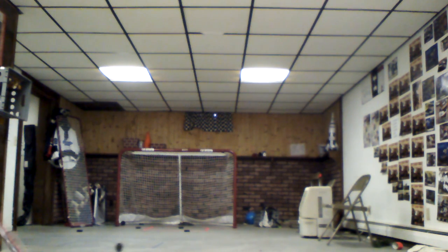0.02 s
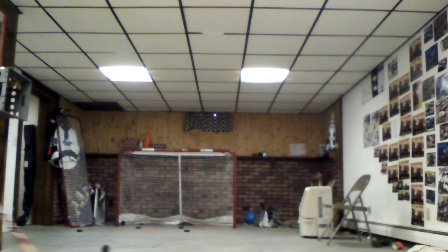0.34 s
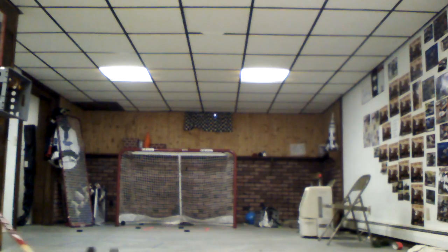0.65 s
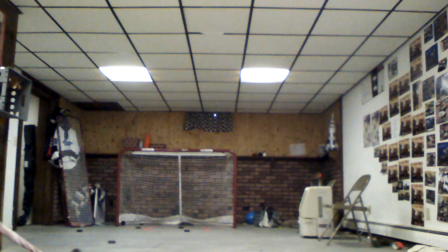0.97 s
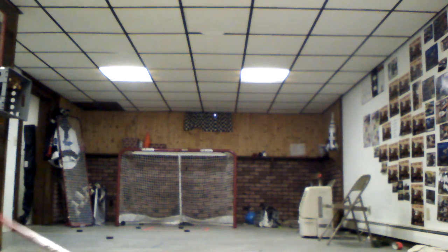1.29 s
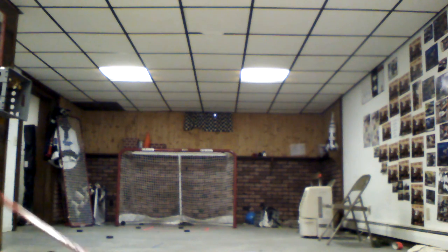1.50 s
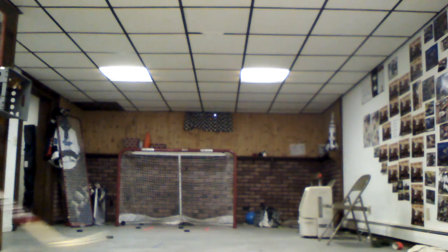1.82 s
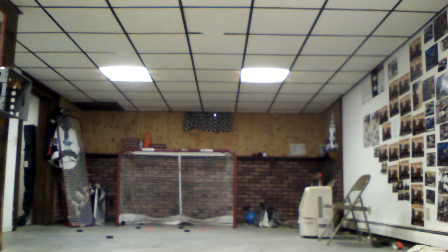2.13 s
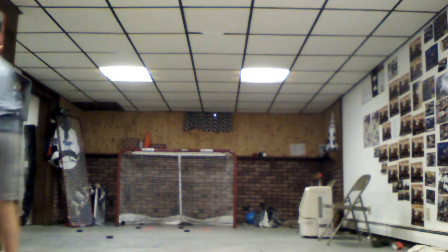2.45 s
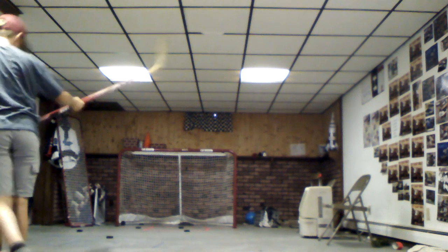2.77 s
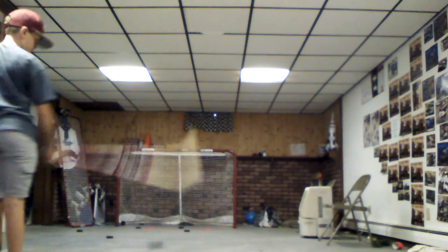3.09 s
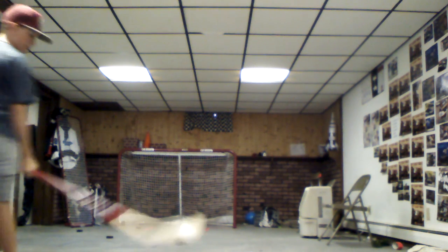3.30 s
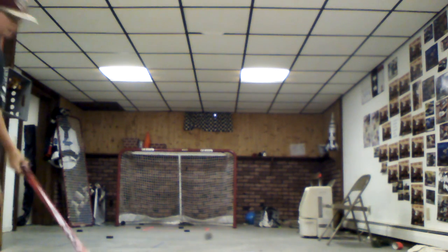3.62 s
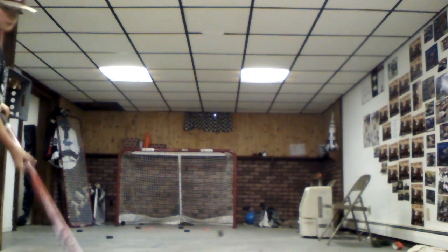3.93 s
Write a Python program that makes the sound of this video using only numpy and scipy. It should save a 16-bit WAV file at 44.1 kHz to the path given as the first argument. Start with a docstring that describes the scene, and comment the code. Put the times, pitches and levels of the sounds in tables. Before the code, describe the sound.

Hockey pucks scrape loudly over a hard floor with a few bumps, and one wobbles to rest. A stick slaps the floor, then cracks a slap shot, heard from a distance in a low basement room.

```python
"""Hockey practice in a low basement room, on a small microphone far enough off to hear mostly walls.
First a loud, gritty scrape, probably pucks swept over the hard floor, dies away among bumps. Around
one second in, a puck wobbles to rest on its rim, leaving mains hum, a low rush and hiss. At 2.3 s the
stick blade slaps the floor; the player steps up, clothes brush on the swing, and at 3.8 s a slap shot
cracks."""
import sys
import numpy as np
from scipy import signal
from scipy.fft import rfft, irfft
from scipy.io import wavfile

SR = 44100
rng = np.random.default_rng(int(sys.argv[2]) if len(sys.argv) > 2 else 0)


def to_wav(sig):
    """Store sig (one row per channel, or 1-D mono) as 16-bit WAV at the path in sys.argv[1].

    Samples outside -1..1 are clipped; the rate is SR.
    """
    pcm = np.clip(np.atleast_2d(sig), -1, 1) * 32767
    pcm = np.round(pcm).astype(np.int16)
    wavfile.write(sys.argv[1], SR, pcm.T)  # frames by channels


N = 176400

# force of the scrape (time [s], level [dB])
SCRAPE_LEVEL = [(0, -8.5), (.12, -10.5), (.36, -11.5), (.46, -12), (.54, -16), (.62, -17), (.72, -19),
                (.8, -29), (.86, -53), (.95, -50)]
# floor and pucks under the scrape (frequency [Hz], relative level [dB])
SCRAPE_BODY = [(60, -45), (200, -30), (450, -17.5), (800, -13), (1150, -6.5), (1550, 1), (2100, -0.5),
               (2800, -4), (4000, -10), (6000, -19.5), (9500, -28.5), (15500, -45.5)]
# broad rasp, sinking as the pucks slow (time [s], pitch [Hz], level [dB])
RASP = [(0, 1981, -22), (.28, 2200, -17.5), (.4, 1844, -16), (0.511, 1812, -12), (0.619, 1750, -19.5),
        (.75, 1650, -28), (.85, 1579, -69)]
# fine hiss of rubber sliding on grit (time [s], level [dB])
SLIDE_LEVEL = [(0, -22), (.2, -23.5), (.45, -28), (.72, -37), (.82, -48.5), (.92, -46), (1.07, -50.5),
               (1.14, -62), (1.24, -68), (1.31, -79.5), (1.38, -92)]
# colour of that hiss (frequency [Hz], relative level [dB])
SLIDE_BODY = [(200, -8.5), (1500, 6), (2600, -1.5), (3250, 6.5), (4200, -3), (5500, -6.5), (7500, 3),
              (10000, -7.5), (15500, -15.5)]
# pucks bumping the blade and one another (time [s], thud level [dB], clack level [dB])
BUMPS = [(.0, -40, -30), (.035, -47, -26), (.172, -36, -33.5), (.24, -47, -39.5), (0.476, -39, -37.5),
         (.745, -35.5, -34), (.78, -53, -24.5), (0.841, -43.5, -37.5), (0.952, -45, -68), (1.126, -62, -51)]
# thud of the floor (frequency [Hz], relative level [dB])
THUD_BODY = [(40, -32), (75, -26), (105, 1.5), (160, -5), (235, 6), (330, -4.5), (700, -24.5), (2000, -56),
             (15500, -86)]
# clack of a puck (frequency [Hz], relative level [dB])
CLACK_BODY = [(100, -31.5), (350, -8), (520, -7.5), (640, 7), (1100, 0), (1600, 1.5), (2300, -15.5),
              (5000, -20.5), (15500, -43)]
# rings of the wobbling puck (pitch [Hz], width [Hz], start [s], length [s], level [dB])
WOBBLE_RINGS = [(153, 54, .83, 0.24, -44.5), (280, 80, 1.12, 0.13, -53), (454, 32, 1.0, 0.194, -49),
                (665, 29, 0.938, 0.212, -36), (918, 59, 1.147, 0.087, -43.5),
                (1622, 90, 1.17, 0.059, -47.5), (1470, 590, .9, 0.33, -49)]
# rumble of the rolling rim (time [s], level [dB])
ROLL_LEVEL = [(.84, -58), (.93, -40.5), (1.18, -53), (1.29, -65), (1.35, -74), (1.39, -93.5)]
# colour of that rumble (frequency [Hz], relative level [dB])
ROLL_BODY = [(50, -18), (130, 0), (400, -5), (900, -7), (1700, -14.5), (2500, -27), (5000, -34),
             (15500, -54)]
# hum of mains and lights (frequency [Hz], level [dB])
HUM_TONES = [(70, -89), (119.5, -80), (240, -92)]
# the hum swells and sinks (time [s], gain [dB])
HUM_SWELL = [(1.5, 0), (2.08, -1.5), (2.14, -5.5), (2.35, -4.5), (2.9, -3), (3.35, -6.5), (3.5, -7)]
# low rush of the room (frequency [Hz], relative level [dB])
AIR_COLOUR = [(20, -6), (50, -9), (100, -8), (220, -1.5), (320, -9.5), (700, -12), (2000, -20.5),
              (15500, -39.5)]
# background hiss (frequency [Hz], relative level [dB])
HISS_COLOUR = [(100, 3.5), (2000, 0), (5500, -5), (7500, 1), (10000, -2.5), (15500, -1)]
# the hiss swells and sinks (time [s], gain [dB])
HISS_SWELL = [(1.4, -4.5), (1.7, -0.5), (2.08, -3.5), (2.12, 1), (3.1, -1.5), (3.5, 0.5)]
# the blade landing, then lying flat (time [s], level [dB], hardness [0 floor slap to 1 shot])
BLOWS = [(2.32, -21.5, 0.12), (2.333, -23.5, 0), (2.353, -20.5, 0.026), (3.833, -22.5, 0.89),
         (3.843, -24.5, 0.92), (3.868, -22.5, 0.97), (3.908, -26.5, 0.83), (3.943, -45, 1)]
# colour of a blow (frequency [Hz], floor slap level [dB], shot level [dB])
BLOW_BODY = [(40, -49, -41.5), (116.2, -21.5, -20.5), (178.8, -24.5, -18), (228.4, -20, -1.5),
             (278, -19.5, -25), (444, -11, -11.5), (637, 0.5, -1.5), (850, -5, -3.5), (1079, -0.5, -2.5),
             (1220, -6.5, 2), (1503, -7.5, -6), (1750, -14, -2), (1900, -14.5, -13.5), (2400, -15, -0.5),
             (2750, -23.5, -6.5), (3540, -21, -11), (4750, -19, -28), (6230, -35, -34.5),
             (7470, -31, -29.5), (9210, -37, -31), (15600, -48.5, -51)]
# shoes scuffing the floor (time [s], level [dB])
SCUFF_LEVEL = [(2.5, -92.5), (2.56, -64.5), (2.68, -69.5), (2.77, -76), (2.84, -73), (2.9, -95)]
# colour of the scuffing (frequency [Hz], relative level [dB])
SCUFF_BODY = [(50, 1), (200, 10), (400, -12), (1100, -9), (2000, -19.5), (3300, -24), (15500, -44)]
# footfalls (time [s], level [dB])
STEPS = [(2.579, -65.5), (2.65, -72), (2.71, -72), (2.775, -73), (2.851, -85), (3.13, -82), (3.56, -88)]
# brushing clothes (frequency [Hz], relative level [dB])
CLOTH_BODY = [(200, 0), (600, 4), (1500, -9), (5000, -14), (7500, 4.5), (11000, -5), (15500, -17)]
# reverberation of the basement (frequency [Hz], time to fall 60 dB [s])
ROOM_T60 = [(80, .36), (250, 0.46), (700, .3), (1500, 0.3), (3000, 0.32), (5000, 0.37), (8000, 0.42),
            (11000, .4), (15000, 0.32)]

TIME = np.arange(N) / SR


def amp(db):
    """Decibels to gain."""
    return 10 ** (np.asarray(db) / 20)


def unit_rms(x):
    """Scales to rms 1."""
    return x / np.sqrt(np.mean(x ** 2) + 1e-20)


def at_frequency(points, hz):
    """Reads a table on a log-frequency axis."""
    table_hz, value = np.transpose(points)
    return np.interp(np.log(hz + 1), np.log(table_hz + 1), value)


def fader(points, after_db=-np.inf):
    """Gain at every sample from (time [s], level [dB]); after_db=None holds the last level."""
    return amp(np.interp(TIME, *np.transpose(points), right=after_db))


def add(mix, start_s, sound):
    """Mixes a sound in at a time."""
    part = mix[round(start_s * SR):][:len(sound)]
    part += sound[:len(part)]


def ring(body, size=4096):
    """Minimum-phase impulse response of a body, with energy 1."""
    log_gain = np.log(amp(at_frequency(body, abs(np.fft.fftfreq(size, 1 / SR)))))
    response = np.fft.ifft(np.exp(np.conj(signal.hilbert(log_gain)))).real[:size // 2]
    return response / np.linalg.norm(response)


def coloured(x, body):
    """Passes a steady signal through a body; rms 1."""
    return unit_rms(signal.oaconvolve(x, ring(body))[:N])


def noise(body):
    """Steady noise in the colour of a body; rms 1."""
    return coloured(rng.standard_normal(N), body)


def resonate(x, hz, width_hz):
    """A steep resonance that follows a pitch curve; rms 1."""
    carrier = np.exp(2j * np.pi * np.cumsum(hz) / SR)
    pole = np.exp(-np.pi * width_hz / SR)
    baseband = signal.lfilter([(1 - pole) ** 2], [1, -2 * pole, pole ** 2], x / carrier)
    return unit_rms((carrier * baseband).real)


def drift(rate_hz):
    """Smooth random wander; rms 1."""
    hz = np.fft.rfftfreq(N, 1 / SR)
    return unit_rms(irfft(rfft(rng.standard_normal(N)) * np.exp(-(hz / rate_hz) ** 2), N))


def impacts(per_s, spread_db=3.5):
    """Random tiny impacts of uneven size."""
    size = amp(spread_db * np.minimum(rng.exponential(1, N), 4))
    return size * rng.choice([-1, 1], N) * (rng.random(N) < per_s / SR)


def strike(body, db, contact_s=.004, chatter=.35):
    """One contact with a short chatter rings a body; db is its level over a tenth of a second."""
    t = np.arange(SR // 20) / SR
    force = rng.standard_normal(len(t)) * np.exp(-t / contact_s)
    force *= chatter / np.linalg.norm(force)
    force[0] += 1
    return amp(db) * np.sqrt(SR / 10) * signal.fftconvolve(force, ring(body))


def echoes(direct_db=-23.5, smear_s=.003, gap_s=.003, build_s=.014):
    """From one spot to the microphone: a weak direct sound, then reflections dying band by band."""
    t = np.arange(SR * 3 // 4) / SR
    taps = rng.choice([-1., 1.], len(t)) * (rng.random(len(t)) < .2)
    hz, frame_s, bands = signal.stft(taps, SR, nperseg=256)
    decay = amp(-60 * frame_s / at_frequency(ROOM_T60, hz)[:, None])
    tail = signal.istft(bands * decay, SR, nperseg=256)[1][:len(t)]
    tail *= 1 - np.exp(-(np.maximum(t - gap_s, 0) / build_s) ** 2)
    direct = taps * np.exp(-t / smear_s)
    return tail / np.linalg.norm(tail) + amp(direct_db) * direct / np.linalg.norm(direct)


def across_room(x, spots=6, shift_s=.11):
    """A source moving before the microphone fades from one spot's echoes to the next."""
    place = np.arange(len(x)) / SR / shift_s
    out = np.zeros(len(x))
    for spot in range(spots):
        away = np.minimum(abs((place - spot + spots / 2) % spots - spots / 2), 1)
        out += signal.fftconvolve(x * np.cos(np.pi / 2 * away), echoes())[:len(x)]
    return out


def scrape(slips_per_s=2600, judder_db=.98, judder_hz=47.5, low_cut_hz=950):
    """Dense, juddering slips make floor and pucks grind and rasp; a finer sliding hiss lasts longer."""
    judder = amp(judder_db * drift(judder_hz))
    grind = coloured(impacts(slips_per_s) * judder, SCRAPE_BODY) * fader(SCRAPE_LEVEL)
    times, hz, db = np.transpose(RASP)
    rasp = resonate(impacts(slips_per_s) * judder, np.interp(TIME, times, hz), width_hz=900)
    rasp *= fader(np.c_[times, db])
    slide = coloured(impacts(slips_per_s) * judder, SLIDE_BODY) * fader(SLIDE_LEVEL)
    low_cut = signal.butter(3, low_cut_hz, "highpass", fs=SR, output="sos")
    return grind + signal.sosfilt(low_cut, rasp + slide)


def bumps():
    """Each bump is a low thud on the floor and a hard clack, from its own spot in the room."""
    out = np.zeros(N)
    for start_s, thud_db, clack_db in BUMPS:
        bump = strike(THUD_BODY, thud_db) + strike(CLACK_BODY, clack_db)
        add(out, start_s, signal.fftconvolve(bump, echoes()))
    return out


def wobble(taps_per_s=300, ramp_s=.0048, sag_db=-9.5):
    """The rim of a settling puck rumbles and taps on the floor; each ring starts fast, sags and stops."""
    taps = impacts(taps_per_s)
    out = coloured(impacts(taps_per_s), ROLL_BODY) * fader(ROLL_LEVEL)
    for hz, width_hz, start_s, length_s, db in WOBBLE_RINGS:
        age = TIME - start_s
        gate = np.clip(np.minimum(age, length_s - age) / ramp_s, 0, 1)
        gain = amp(db + sag_db * np.clip(age / length_s, 0, 1))
        out += gain * gate * resonate(taps, np.full(N, hz), width_hz)
    return out


def room_tone(air_db=-84.5, hiss_db=-75.5, buzz_hz=120, buzz_depth=.15):
    """Heard once the puck is still: electric hum, a low rush and a hiss that pulses with the mains."""
    hum = sum(amp(db) * np.sqrt(2) * np.sin(2 * np.pi * (hz * TIME + rng.random()))
              for hz, db in HUM_TONES)
    air = amp(air_db) * noise(AIR_COLOUR)
    hiss = amp(hiss_db) * fader(HISS_SWELL, after_db=None) * noise(HISS_COLOUR)
    buzz = 1 + buzz_depth * np.sin(2 * np.pi * buzz_hz * TIME)
    return hum * fader(HUM_SWELL, after_db=None) + air + buzz * hiss


def stick():
    """The blade strikes floor and puck, each time at a new spot; a harder blow rings brighter."""
    out = np.zeros(N)
    hz, slap_db, shot_db = np.transpose(BLOW_BODY)
    for start_s, db, hardness in BLOWS:
        body = np.c_[hz, slap_db + hardness * (shot_db - slap_db)]
        add(out, start_s, signal.fftconvolve(strike(body, db), echoes()))
    return out


def player(brush_at_s=2.818, brush_width_s=.018, brush_db=-61.5):
    """Shoes scuff and tread softly on the floor; clothes brush as the stick goes up."""
    brush = amp(brush_db) * np.exp(-.5 * ((TIME - brush_at_s) / brush_width_s) ** 2)
    cloth = brush * noise(CLOTH_BODY)
    shoes = noise(SCUFF_BODY) * fader(SCUFF_LEVEL) * (TIME > SCUFF_LEVEL[0][0])
    for start_s, db in STEPS:
        add(shoes, start_s, strike(THUD_BODY, db))
    return shoes + cloth


def scene():
    """Pucks, stick and player as they reach the microphone, nearly all by way of the walls."""
    scraping = scrape()
    lead = SR // 10  # a mirrored lead-in, so the room is already full of the scrape at the start
    moving = np.r_[scraping[lead:0:-1], scraping + wobble() + player()]
    return (across_room(moving)[lead:] + bumps() + stick())[None]


def record(dry, peak_hz=7260, width_hz=800, ceiling=.97, edge_hz=15750):
    """A small microphone in the room tone: treble resonance, overload on the highest peaks, band limit."""
    sound = dry + room_tone()
    resonance = signal.lfilter(*signal.iirpeak(peak_hz, peak_hz / width_hz, SR), sound)
    bright = sound + amp(4) * resonance
    limited = bright / (1 + (bright / ceiling) ** 6) ** (1 / 6)
    band_limit = signal.firwin(511, edge_hz, window=("kaiser", 9), fs=SR)
    return signal.oaconvolve(limited, band_limit[None], "same")


dry = scene()
out = record(dry)
to_wav(out)
```